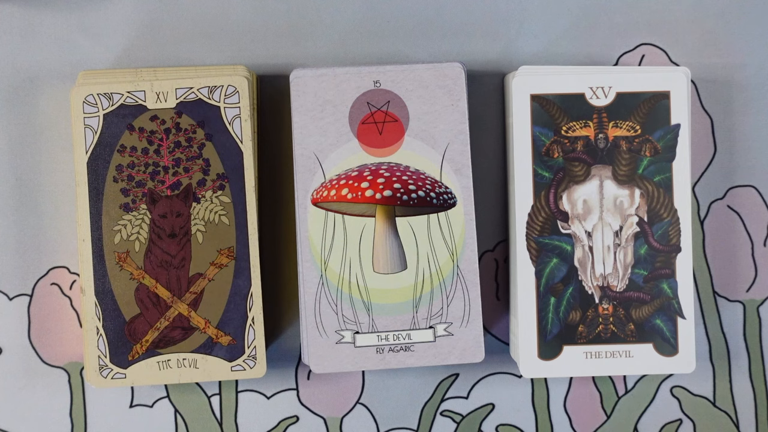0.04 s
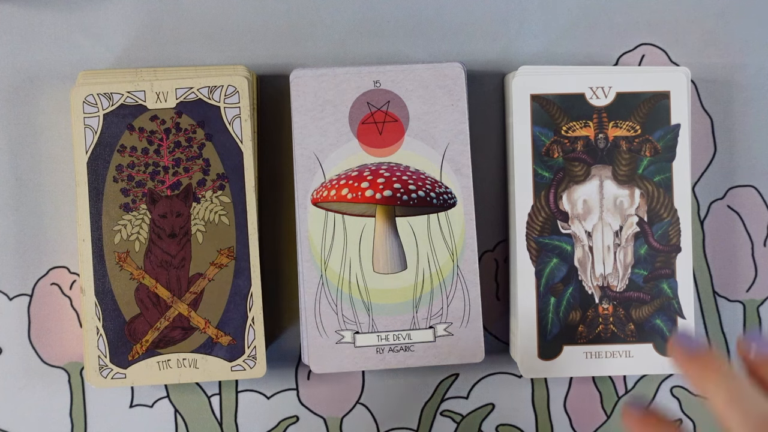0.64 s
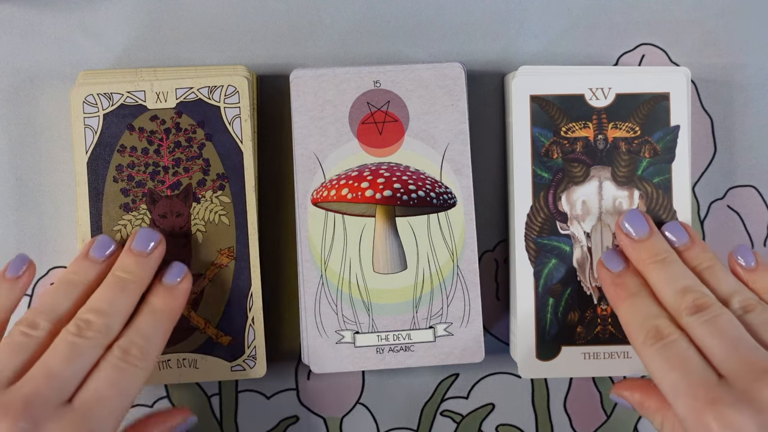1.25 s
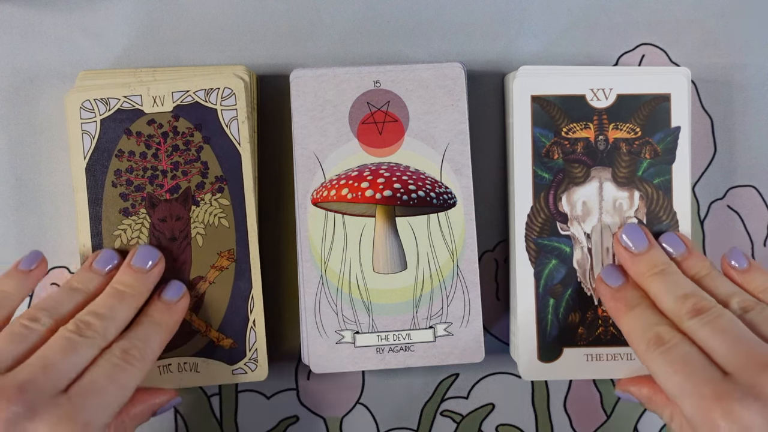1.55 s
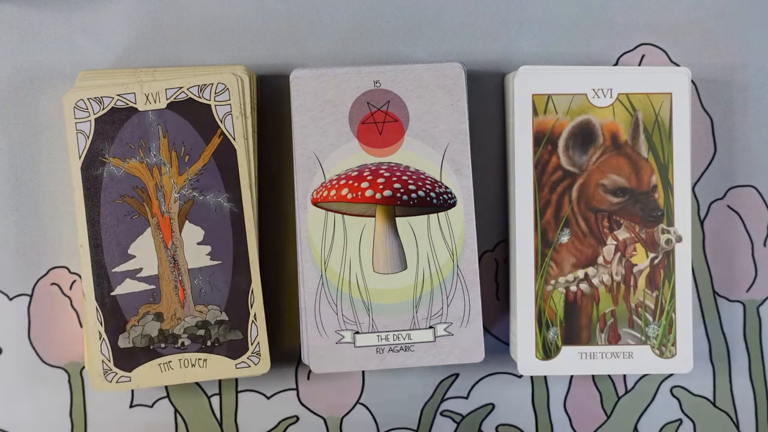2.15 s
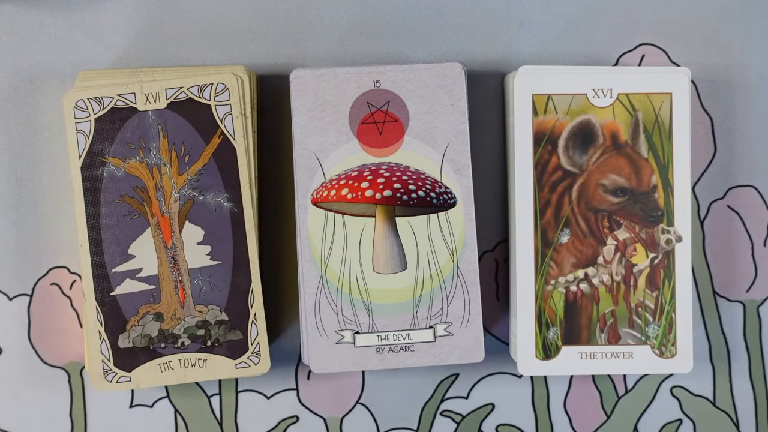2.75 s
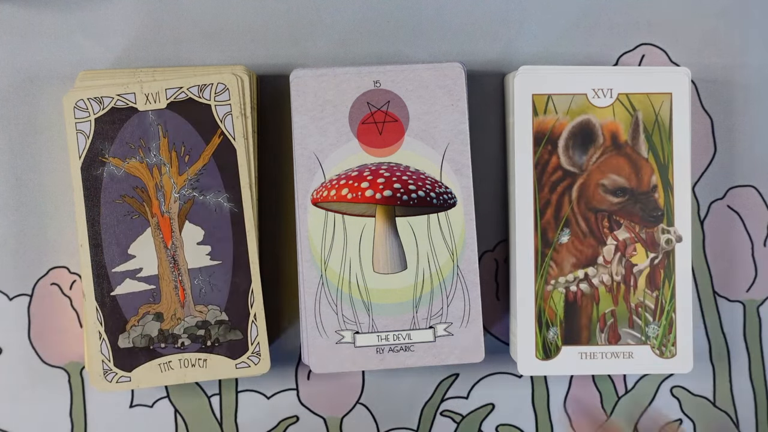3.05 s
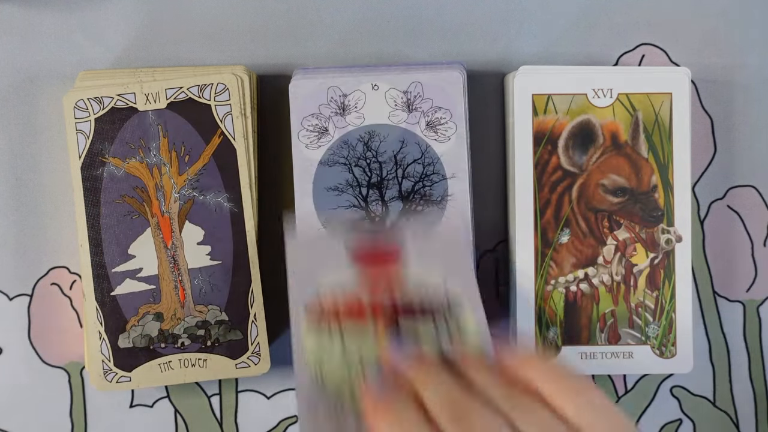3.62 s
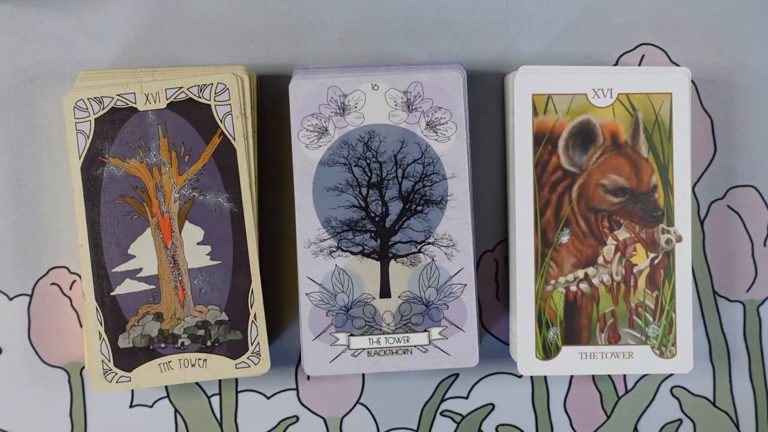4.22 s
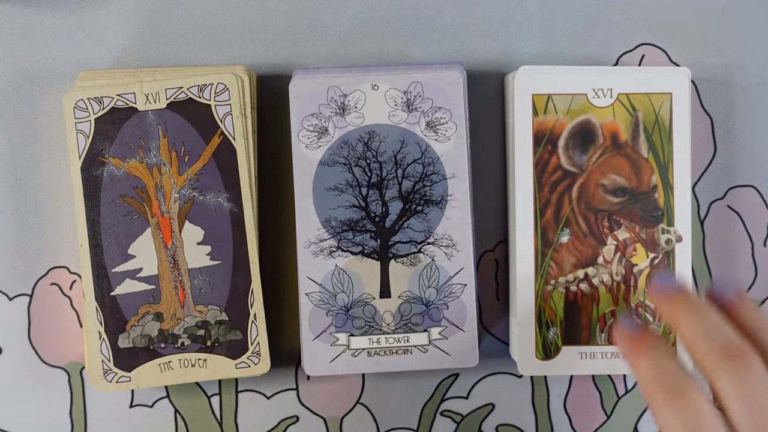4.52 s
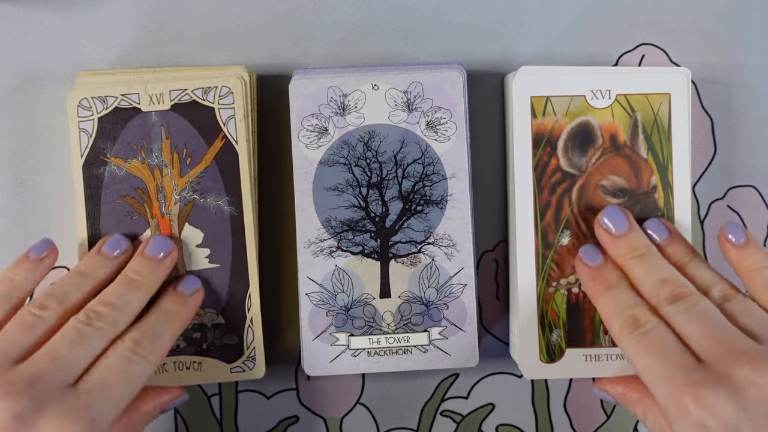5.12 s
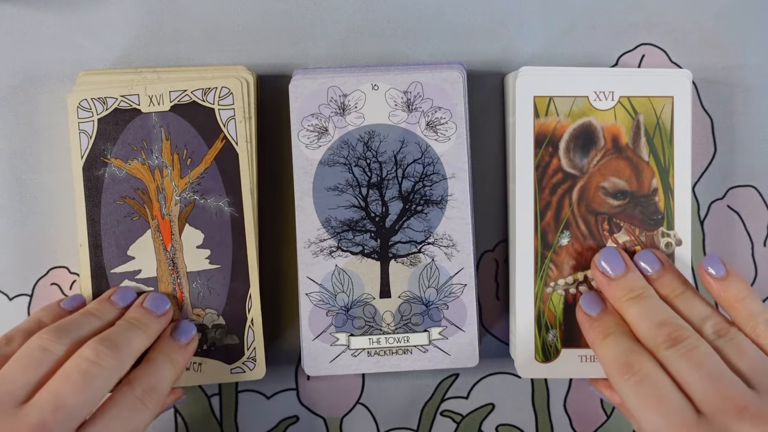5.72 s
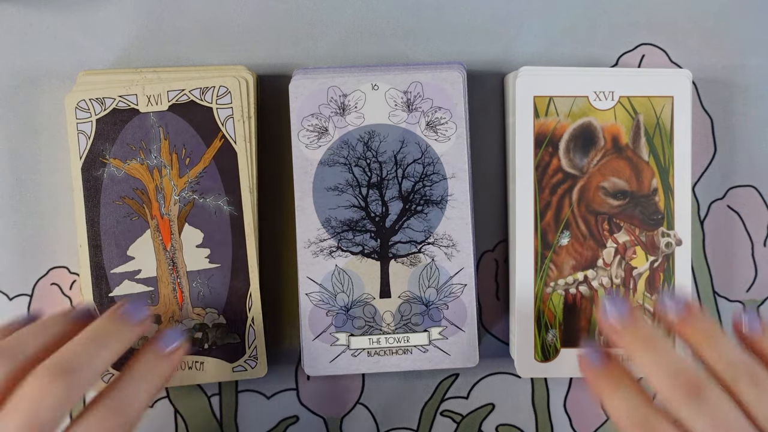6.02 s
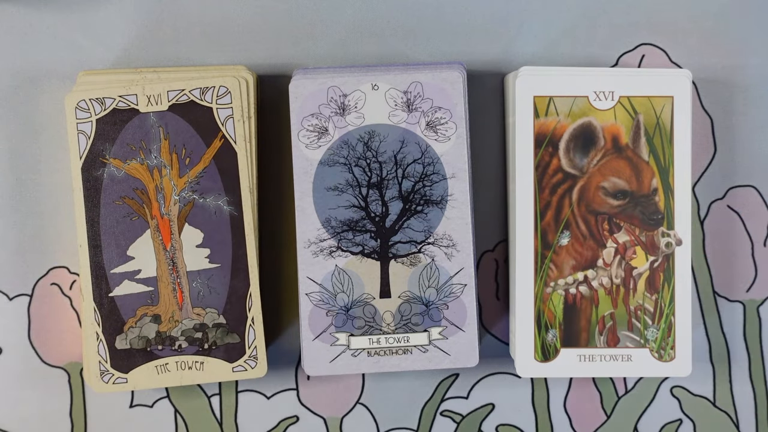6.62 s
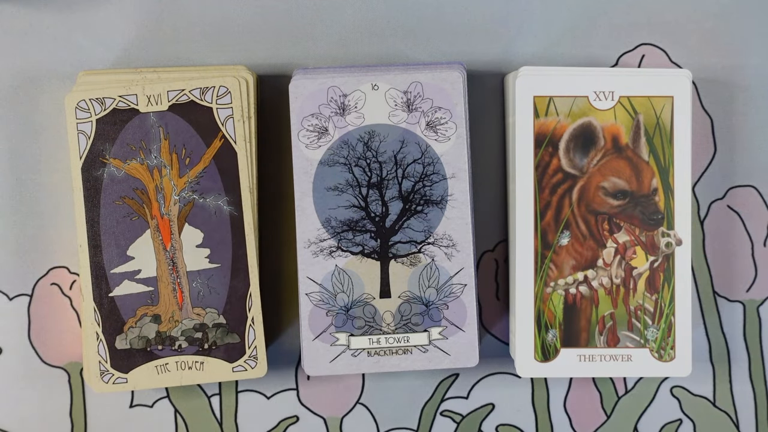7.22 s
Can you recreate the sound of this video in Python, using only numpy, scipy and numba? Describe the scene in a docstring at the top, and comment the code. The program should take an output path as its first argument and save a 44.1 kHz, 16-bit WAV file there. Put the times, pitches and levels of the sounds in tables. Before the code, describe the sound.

Stiff paper cards are handled close to the microphone on a cloth-covered table in a small, quiet room. At about 0.3 seconds a card gives a light snap with a soft rub, followed by barely audible touches. At 2 seconds a card swishes quickly off its deck, then brushes and flutters faintly. Small ticks around 2.5 seconds lead to two sharp snaps at 2.8 seconds, the loudest sounds, with a soft slap as the card lands flat. A second short, stronger swish comes at 3.6 seconds, followed by light taps and sliding, and a crisp double click near 4.15 seconds. From 5 to 6 seconds, fingers shift cards with very faint rubbing and tiny ticks. After that, only the background remains until about 7.5 seconds: a low steady hiss, a distant fan and a faint hum, present throughout.

```python
"""A quiet room, close to a cloth-covered table: tarot cards are drawn off their decks.
Fingers ease each top card loose, it swishes off the deck, then snaps and taps down on a pile at the side.
Paper friction is a stream of tiny slips; each contact rings the stiff card and, if it lands flat,
the table. Behind it: steady hiss, a distant fan and a faint hum."""
import sys
import numpy as np
from scipy import signal
from scipy.fft import rfft, irfft
from scipy.io import wavfile
from numba import njit

SR = 44100
rng = np.random.default_rng(int(sys.argv[2]) if len(sys.argv) > 2 else 0)


def output_pcm(signal):
    """Save a mono or channel-first signal as 16-bit PCM at the path in sys.argv[1].

    Samples are clipped to [-1, 1] before scaling.
    """
    pcm = np.clip(np.atleast_2d(signal).T, -1, 1) * 32767
    wavfile.write(sys.argv[1], SR, np.round(pcm).astype(np.int16))


N = 320166
T = np.arange(N) / SR
SIDE = np.array([[1], [-1]])  # left_sign, right_sign
CONTACT_LEAD = SR // 50  # samples ahead of a contact's release
THUD_DB = -25  # table re card flex, in a tap


def undb(db):
    """Decibels to gain."""
    return 10 ** (np.asarray(db) / 20)


def unit(x):
    """Scale to rms 1."""
    return x / np.sqrt(np.mean(x ** 2) + 1e-30)


def colour(x, points):
    """Filter by a spectrum of (freq_hz, gain_db) points."""
    hz, db = np.transpose(points)
    bins_hz = np.fft.rfftfreq(x.shape[-1], 1 / SR)
    gain = undb(np.interp(np.log(bins_hz + 1), np.log(hz), db))
    return irfft(rfft(x) * gain, x.shape[-1])


def above(x, hz):
    """Second-order high-pass: a small card radiates little bass."""
    return signal.sosfilt(signal.butter(2, min(hz, SR / 3), "high", fs=SR, output="sos"), x)


def resonate(x, hz, width_hz):
    """One resonance, gain 1 at its centre."""
    hz = min(hz, .45 * SR)
    return signal.lfilter(*signal.iirpeak(hz, hz / min(width_hz, SR / 4), fs=SR), x)


def ring(x, modes):
    """A body's modes, each applied twice for steep skirts."""
    return sum((-1) ** k * undb(db) * resonate(resonate(x, hz, width_hz), hz, width_hz)
               for k, (hz, width_hz, db) in enumerate(modes))


@njit
def sweep(x, hz, q):
    """A moving resonance, gain 1 at its centre."""
    y, band, low = np.empty(len(x)), 0., 0.
    for i in range(len(x)):
        g = np.tan(np.pi * hz[i] / SR)
        v = (band + g * (x[i] - low)) / (1 + g * (g + 1 / q))
        band = 2 * v - band
        low += 2 * g * v
        y[i] = v / q
    return y


def wander(count, rate_hz, depth_db):
    """A randomly wandering gain, rms 1."""
    knots_db = depth_db * rng.standard_normal(8192)
    return unit(undb(np.interp(T[:count] * rate_hz, np.arange(8192), knots_db)))


def air(hiss_db=-64.6, fan_db=-72):
    """Steady hiss, the breathy resonances of a distant fan, and a faint hum."""
    # hiss spectrum: freq_hz, gain_db
    hiss_colour = [(18, -50.5), (30, -19.5), (48, -14.5), (66, -15.5), (81, -27.5), (144, -12), (277, -12),
                   (443, -7), (518, -8), (874, -4), (1360, -4.5), (1720, -2), (2990, -10), (12900, -17.5),
                   (15500, -19.5)]
    # hiss stereo width: freq_hz, side_re_mid_db
    side_colour = [(60, -14), (110, -9), (200, -8.5), (380, -5), (700, -5.5), (1290, -3.5), (2380, -4),
                   (4400, -5), (8120, -6.5), (15000, -9.5)]
    # fan resonances: freq_hz, width_hz, gain_db
    fan_modes = [(843, 74, -6), (1501, 130, -2), (1775, 230, 0.5)]
    # hum tones: pitch_hz, level_db
    hum_tones = [(59.2, -99), (140.0, -100)]
    mid, side = colour(rng.standard_normal((2, N)), hiss_colour)
    hiss = unit(mid + colour(side, side_colour) * SIDE)
    fan_mid, fan_side = ring(rng.standard_normal((2, N)), fan_modes)
    fan = unit(fan_mid + undb(-7) * fan_side * SIDE) * wander(N, rate_hz=9.9, depth_db=3)
    hum = sum(undb(db) * np.sqrt(2) * np.sin(2 * np.pi * hz * T) for hz, db in hum_tones)
    return undb(hiss_db) * hiss + undb(fan_db) * fan + hum


def room(x, echo_db=-19, t60_s=0.35, onset_s=0.0011):
    """A small furnished room: a short diffuse tail, partly different in each ear."""
    # echo spectrum: freq_hz, gain_db
    echo_colour = [(100, -4.5), (300, 10), (1500, 6), (3500, -1.5), (7000, -2), (15000, -9)]
    t = T[:SR // 2]
    envelope = 10 ** (-3 * t / t60_s) * np.clip(t / onset_s - .5, 0, 1)
    mid, side = rng.standard_normal((2, len(t))) * envelope
    tails = unit(colour(mid + undb(-6.5) * side * SIDE, echo_colour)) / np.sqrt(len(t))
    return undb(echo_db) * signal.fftconvolve(x[None], tails, axes=1)[:, :N]


def near_scatter(x, side_db=-17, decay_s=0.00086):
    """Hands and decks scatter the sound differently to left and right."""
    t = T[:SR // 100]
    scatter = unit(rng.standard_normal(len(t)) * np.exp(-t / decay_s)) / np.sqrt(len(t))
    return undb(side_db) * signal.fftconvolve(x, scatter)[:N] * SIDE


def slips(count, spread_db):
    """Paper fibres catch and let go: dense clicks of uneven size."""
    sizes_db = spread_db * rng.uniform(-1, 1, count)
    return unit(rng.standard_normal(count) * undb(sizes_db))


def gap_ring(x, hz, q):
    """Friction rings the gap under the card, at a steady or gliding pitch."""
    return unit(sweep(x, hz * np.ones(len(x)), float(q)))


def rub(count, gap_hz, hollow_db, hiss_db, slide_db=-1, gap_db=-2.5, dull_below_hz=3300):
    """Slips ring the card, the gap under it and its cut edge; a wide, low gap is a dull, loose contact."""
    # bright sliding resonances: freq_hz, width_hz, gain_db
    slide_modes = [(4050, 900, 2), (5200, 1200, -1), (6200, 1100, 5), (7160, 2520, -4.5)]
    # hollow resonances: freq_hz, width_hz, gain_db
    hollow_modes = [(1338, 1200, -7.5), (1820, 450, 1.5), (2400, 860, -6), (3050, 840, -1.5)]
    grip = wander(count, rate_hz=190, depth_db=1.64)
    friction = slips(count, spread_db=9.5) * grip
    gap_drive = above(slips(count, spread_db=6) * grip, hz=np.mean(gap_hz) / 2)
    gap = gap_ring(gap_drive, gap_hz, q=7.2)
    slide = unit(ring(friction, slide_modes)) * np.minimum(gap_hz / dull_below_hz, 1) ** 2
    hollow = unit(ring(friction, hollow_modes))
    hiss = unit(above(resonate(friction, hz=9000, width_hz=4170), hz=7730))
    return undb(slide_db) * slide + undb(gap_db) * gap + undb(hollow_db) * hollow + undb(hiss_db) * hiss


def rubs(trim_db=-1, drop_db=-9, sag_octaves_per_s=1.5, rest_s=0.24, stop_s=0.12):
    """Each slow push of a card swells and dies away; the gap under it rings lower as it opens."""
    # card on card: peak_s, level_db, rise_s, fall_s, gap_hz, hollow_re_level_db, hiss_re_level_db
    pushes = [(0.005, -59.5, 0.023, 0.093, 3100, -6, -2.5), (0.329, -55, 0.033, 0.07, 2770, 0, -9),
              (0.503, -61.5, 0.012, 0.048, 1170, -5, -16), (0.89, -65, 0.018, 0.032, 1130, -10, -16),
              (1.615, -67, 0.036, 0.027, 5270, -4, -5), (1.73, -67.5, 0.053, 0.054, 6000, -5, -6),
              (1.84, -60, 0.043, 0.04, 5300, -16, -16), (1.935, -53, 0.036, 0.067, 5500, -12.5, -13),
              (2.001, -48, 0.039, 0.074, 3900, -12, -10), (2.1, -49.5, 0.02, 0.029, 6100, -6, -4),
              (2.16, -53.5, 0.038, 0.05, 6200, -4, -1.5), (2.262, -52.5, 0.023, 0.02, 5500, -7, -5),
              (2.596, -52.5, 0.022, 0.048, 6200, -9.5, -1), (2.68, -50, 0.075, 0.08, 3070, -4.5, -10),
              (2.797, -39, 0.05, 0.045, 6200, -3.5, -11.5), (2.845, -54, 0.03, 0.042, 4200, 1.5, -12),
              (3.578, -52.5, 0.033, 0.08, 5840, -6, -10), (3.71, -52.5, 0.02, 0.033, 5300, -16.5, -5),
              (3.835, -49, 0.059, 0.077, 2400, -6, -2.5), (4.053, -62, 0.079, 0.12, 3000, 2, -7),
              (4.135, -49, 0.017, 0.028, 3250, 0, -12), (4.18, -64.5, 0.026, 0.1, 3540, 1, -9),
              (5.15, -69.5, 0.08, 0.074, 6000, -1, -2), (5.274, -61.5, 0.029, 0.033, 4400, -6, -6.5),
              (5.417, -60.5, 0.03, 0.035, 4250, -4.5, -13), (5.55, -55.5, 0.063, 0.11, 6200, -9.5, -5.5),
              (5.72, -66.5, 0.034, 0.064, 3960, 0.5, -6), (5.888, -60, 0.023, 0.024, 4030, 3.5, -3),
              (5.917, -57, 0.021, 0.028, 3050, -4.5, -8)]
    out = np.zeros(N)
    for peak_s, level_db, rise_s, fall_s, gap_hz, hollow_db, hiss_db in pushes:
        span = max(int(peak_s * SR) - SR // 4, 0) + np.arange(SR // 2)
        t = T[span] - peak_s
        swell_db = drop_db * np.abs(t / np.where(t < 0, rise_s, fall_s)) ** 1.7
        stopping = np.clip((rest_s - t) / stop_s, 0, 1)
        sound = rub(len(t), gap_hz * 2 ** (-sag_octaves_per_s * t), hollow_db, hiss_db)
        out[span] += undb(level_db + trim_db + swell_db) * stopping * sound
    return out


def wobble(first_brush_s=2.2825, length_s=0.25, period_ms=16.7, brush_ms=2.24,
           level_db=-54.5, fade_db_per_s=-48, drag_db=-7, uneven_db=0.55):
    """A lifted card wobbles and brushes the deck once a cycle, dragging lightly in between."""
    t = T[:SR // 2]
    cycles = t * 1000 / period_ms
    strength = undb(uneven_db * rng.standard_normal(SR // 100))[cycles.astype(int)]
    brushes = strength * np.exp(-((cycles % 1 - .5) * period_ms / brush_ms) ** 2)
    gain = undb(level_db + fade_db_per_s * t) * (brushes + undb(drag_db)) * (t < length_s)
    sound = gain * rub(len(t), gap_hz=6200, hollow_db=-4.5, hiss_db=-7.5)
    start = int((first_brush_s - period_ms / 2000) * SR)
    return np.pad(sound, (start, N - start - len(t)))


def swishes(trim_db=1, hiss_db=-6, edge_rise_db=12.5, gap_db=-9, gap_hz=4000, gap_rise_octaves=0.66):
    """A fast pull: one card's edge slips along the next one's face; the gap rings higher as it shortens."""
    # pulls off the deck: start_s, attack_s, hold_s, release_s, level_db, hold_fade_db, end_hiss_db
    pulls = [(2.015, 0.032, 0.033, 0.019, -27, -1, 3.5), (3.615, 0.028, 0.012, 0.01, -22.5, 0, -7),
             (3.657, 0.0095, 0.03, 0.0094, -33.5, -2.5, -0.5)]
    # face spectrum, one list per pull: freq_hz, gain_db
    face_colours = [
        [(290, -75.5), (500, -56), (577, -51), (620, -45), (888, -34), (1240, -27), (2390, -6), (2800, -7.5),
         (3150, -2), (4190, -3), (4640, -1.5), (6180, 0), (7130, -5.5), (10200, -6), (15500, -28.5)],
        [(290, -75), (500, -50), (1240, -33), (1410, -15), (1670, -16.5), (2130, -4), (3060, -1), (3280, 1.5),
         (3850, -6), (4500, -0.5), (5350, -14), (7030, -5), (8600, -12), (10800, -11.5), (15500, -30)],
        [(290, -59), (500, -51), (666, -27.5), (1170, -24), (1510, -18), (2760, -28), (3190, -5), (3480, -1),
         (4770, -3.5), (5200, 2), (7890, -3), (9110, -4.5), (15500, -24.5)],
    ]
    out = np.zeros(N)
    count = SR // 4
    for pull, face_colour in zip(pulls, face_colours):
        start_s, attack_s, hold_s, release_s, level_db, hold_fade_db, end_hiss_db = pull
        length_s = attack_s + hold_s + release_s
        span = np.flatnonzero((T > start_s) & (T < start_s + length_s))
        t = T[span] - start_s
        progress = t / length_s
        speed = np.interp(t, [0, attack_s, attack_s + hold_s, length_s], [0, 1, 1, 0]) ** 1.45
        fade_db = hold_fade_db * np.clip((t - attack_s) / hold_s, 0, 1)
        gain = speed * undb(level_db + trim_db + fade_db)
        friction = slips(count, spread_db=4) * wander(count, rate_hz=620, depth_db=2.5)
        face = unit(colour(friction, face_colour)[:len(t)])
        gap_drive = above(slips(count, spread_db=2), hz=2500)[:len(t)]
        gap = gap_ring(gap_drive, gap_hz * 2 ** (gap_rise_octaves * progress), q=9)
        edge_hiss = resonate(slips(count, spread_db=19), hz=11200, width_hz=5200)
        edge = unit(above(edge_hiss, hz=8000)[:len(t)])
        edge_db = hiss_db + end_hiss_db - edge_rise_db * (1 - progress)  # grows toward the deck's end
        out[span] += gain * (face + undb(gap_db) * gap + undb(edge_db) * edge)
    return out


def disperse(x, lag_ms):
    """Bending waves in card are slower at low pitch: 1 kHz lags 6 kHz by lag_ms."""
    khz = np.fft.rfftfreq(len(x), 1 / SR) / 1000
    turns = lag_ms * (2 * np.sqrt(khz) - khz / np.sqrt(6)) / (1 - 1 / np.sqrt(6))
    return irfft(rfft(x) * np.exp(-2j * np.pi * turns), len(x))


def contact(ring_hz, rise_ms, fall_ms, flex_db, thud_db, crack_db, q=3.1, rustle_db=-26, rustle_ms=4):
    """A release amid tiny slips rings the edge, the whole card and the table."""
    # card bending modes: freq_hz, width_hz, gain_db
    flex_modes = [(1090, 730, -2.5), (1425, 231, 4.5), (1930, 710, 0), (2500, 910, 2)]
    # table modes: freq_hz, width_hz, gain_db
    table_modes = [(110, 90, -23), (265, 120, 1), (370, 220, -1.5), (510, 170, -1), (782, 265, 7.5)]
    ms = (np.arange(SR // 10) - CONTACT_LEAD) * 1000 / SR
    grip = np.exp(-np.abs(ms) / (np.where(ms < 0, rise_ms, fall_ms) + 1e-3))
    rustle = undb(rustle_db) * np.exp(-np.abs(ms) / rustle_ms) * (ms > 0)
    friction = 0.25 * (grip + rustle) * slips(len(ms), spread_db=8)
    push = disperse((ms == 0) + friction, lag_ms=1.115)
    width_hz = ring_hz / q
    edge = unit(resonate(resonate(push, ring_hz, width_hz), ring_hz, 2.33 * width_hz))
    flex = undb(flex_db) * unit(above(ring(push, flex_modes), hz=700))
    thud = undb(thud_db) * unit(ring(push, table_modes))
    crack = undb(crack_db) * unit(above(resonate(push, hz=8700, width_hz=1300), hz=5500))
    return (edge + flex + thud + crack) * np.sqrt(3 / 100)  # level: 100 ms of energy taken over 3 ms


def place(sound, time_s, level_db, pan_db):
    """Set a contact in time and stereo; pan_db is left minus right."""
    out = np.zeros((2, N))
    start = int(time_s * SR) - CONTACT_LEAD
    out[:, start:start + len(sound)] = undb(level_db + SIDE * pan_db / 2) * sound
    return out


def landing():
    """A card slaps down flat, a soft contact that also rings the table."""
    slap = contact(ring_hz=4200, rise_ms=0.606, fall_ms=10.2, flex_db=-8, thud_db=-6.5, crack_db=-7)
    return place(slap, time_s=2.8155, level_db=-30, pan_db=1)


def skips(snap_s, level_db, ring_hz, flex_db, crack_db, pan_db, spacing_ms=2.8, step_db=5, grip_ms=0.1405):
    """A bent corner skips over the pile's edges: three uneven ticks that grow toward the snap."""
    out = np.zeros((2, N))
    for k in (1, 2, 3):
        tick = contact(ring_hz, grip_ms, grip_ms, flex_db, flex_db + THUD_DB, crack_db)
        early_s = (k + 0.15 * rng.standard_normal()) * spacing_ms / 1000
        out += place(tick, snap_s - early_s, level_db - k * step_db, pan_db)
    return out


def snaps(skip_above_db=-21):
    """Corners snap and edges tap; the hardest bend the corner enough to skip first."""
    # snaps and taps: time_s, level_db, ring_hz, rise_ms, fall_ms, flex_db, crack_db, pan_db
    hits = [(0.229, -54, 3850, 0.67, 3.3, 3.5, -1, -0.8), (0.29, -46, 2400, 0.06, 0.49, -6, -19, 0),
            (0.339, -26.5, 3120, 2.6, 1.3, -29, -15, -0.2), (0.354, -37, 3930, 2.8, 2.3, -17, -5.5, -0.5),
            (1.359, -59.5, 3100, 2, 3, -8, -7, 0), (1.407, -60.5, 3050, 1.5, 2, -12, -20, 0),
            (2.165, -46, 6000, 2.2, 2, -11, -4, -1), (2.2592, -45, 5700, 1.0, 1.6, -8, -8, 0),
            (2.547, -41, 5200, 0.065, 1.9, -4.5, -3.5, -2.5),
            (2.5795, -36.5, 5060, 0.18, 3, -1.5, -4.5, 0.5), (2.648, -45, 5500, 0.1, 0.9, -28, -11, -5),
            (2.683, -48, 4510, 0.3, 1.3, -10, -10, -7), (2.7626, -16.8, 6487, 0.3, 1.1, -17.5, -18, -3.5),
            (2.8128, -16.5, 5500, 0.6, 1.1, -13, -5, 0.6), (3.8691, -34.5, 3700, 3, 3.1, -1.5, -5.5, -1),
            (4.0082, -38.5, 4020, 0.099, 2.5, 1.5, -8, -0.5), (4.0152, -39.5, 2500, 1.4, 2.7, 0.5, -19, -1),
            (4.0856, -40.5, 2750, 0.09, 0.29, -13, -17, -1.1), (4.1392, -25.5, 3300, 2.2, 1, -8, -13, -1),
            (4.1535, -26, 3880, 0.16, 0.5, -32, -20, -0.5), (5.049, -59, 4530, 0.2, 1.3, -1.5, 1.5, -1),
            (5.331, -60, 5600, 0.81, 1.5, -15.5, -13, 0.5), (5.809, -60, 3200, 0.66, 3.1, 0, -6, -0.9)]
    out = np.zeros((2, N))
    for time_s, level_db, ring_hz, rise_ms, fall_ms, flex_db, crack_db, pan_db in hits:
        snap = contact(ring_hz, rise_ms, fall_ms, flex_db, flex_db + THUD_DB, crack_db)
        out += place(snap, time_s, level_db, pan_db)
        if level_db > skip_above_db:
            out += skips(time_s, level_db, ring_hz, flex_db, crack_db, pan_db)
    return out


def scene():
    """The cards close by, their reflections, and the room's own noise."""
    cards = snaps() + landing() + swishes() + rubs() + wobble()
    mono = cards.mean(axis=0)
    return cards + near_scatter(mono) + room(mono) + air()


def record(dry):
    """Rumble filter and a steep top cut."""
    low_hz, top_hz = 45, 15900
    dry = signal.sosfilt(signal.butter(4, low_hz, "high", fs=SR, output="sos"), dry)
    return signal.sosfilt(signal.ellip(10, .2, 70, top_hz, fs=SR, output="sos"), dry)


dry = scene()
out = record(dry)
output_pcm(out)
```